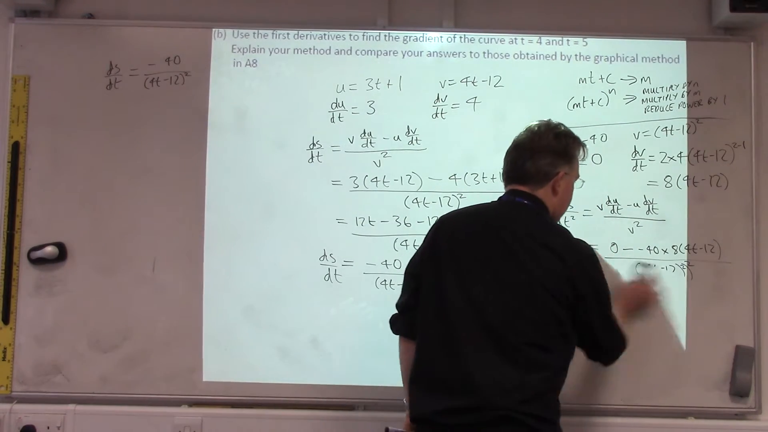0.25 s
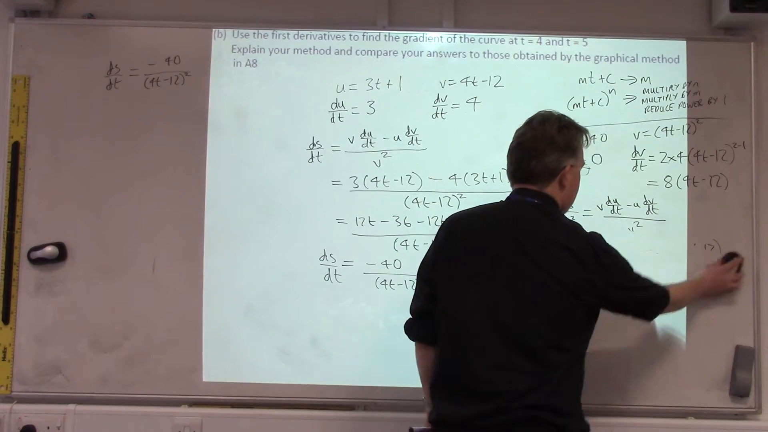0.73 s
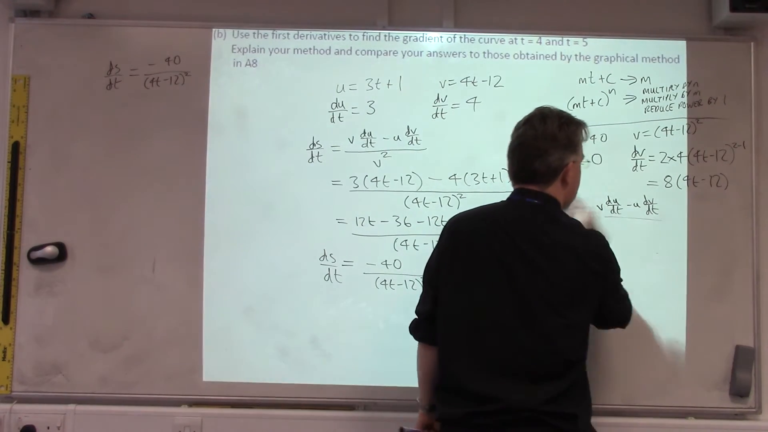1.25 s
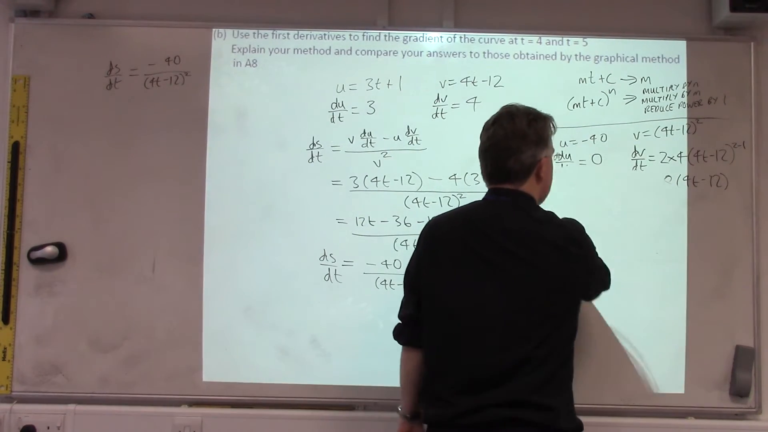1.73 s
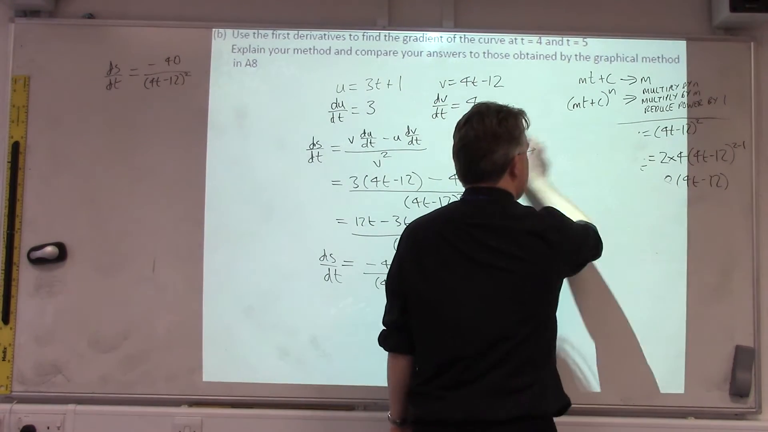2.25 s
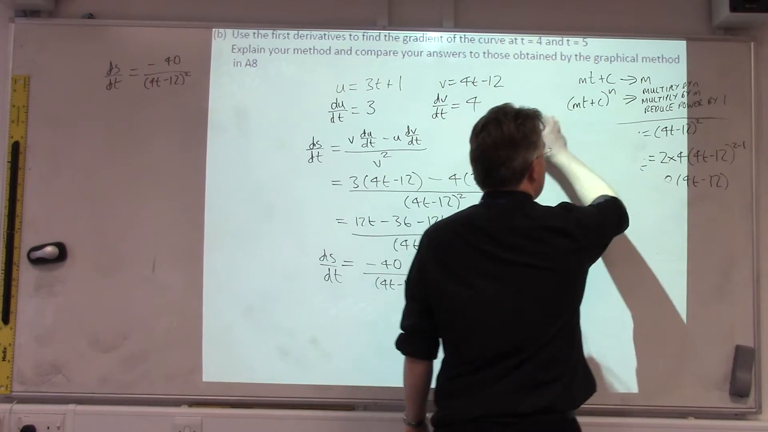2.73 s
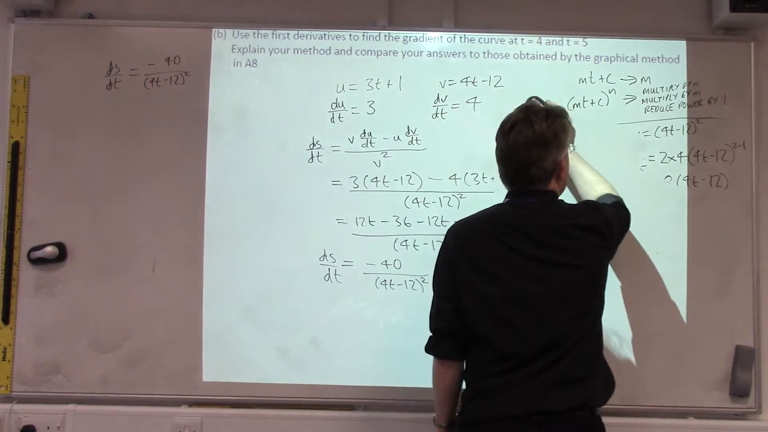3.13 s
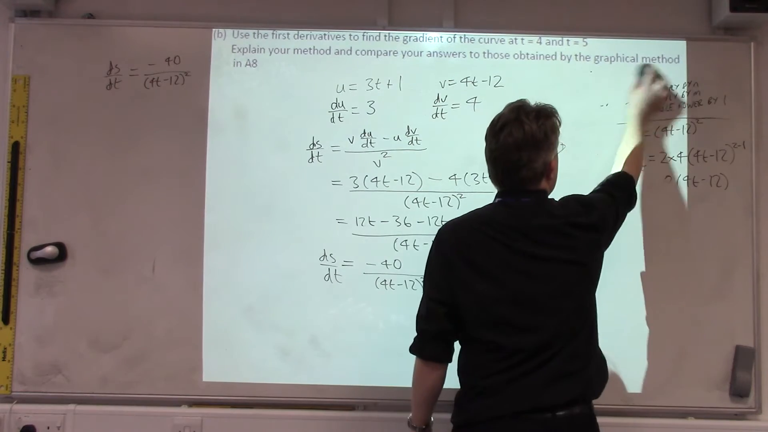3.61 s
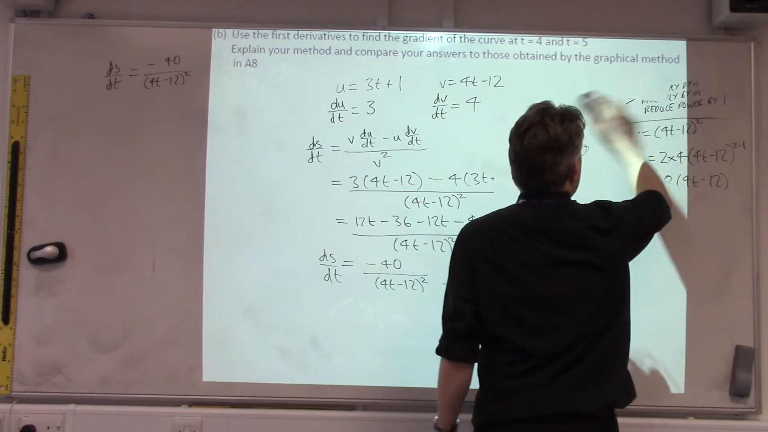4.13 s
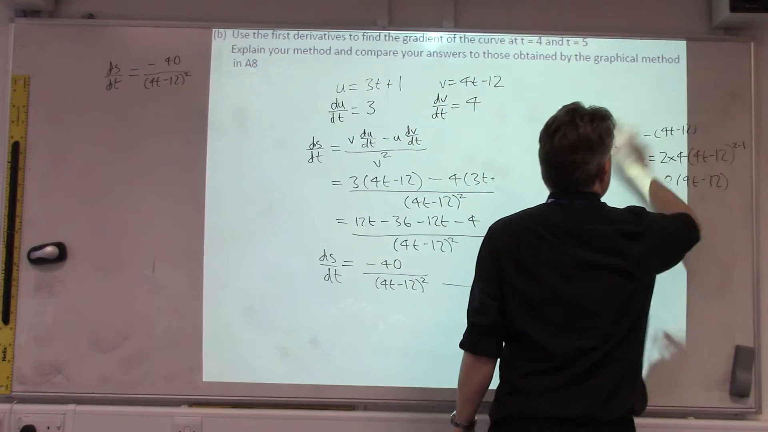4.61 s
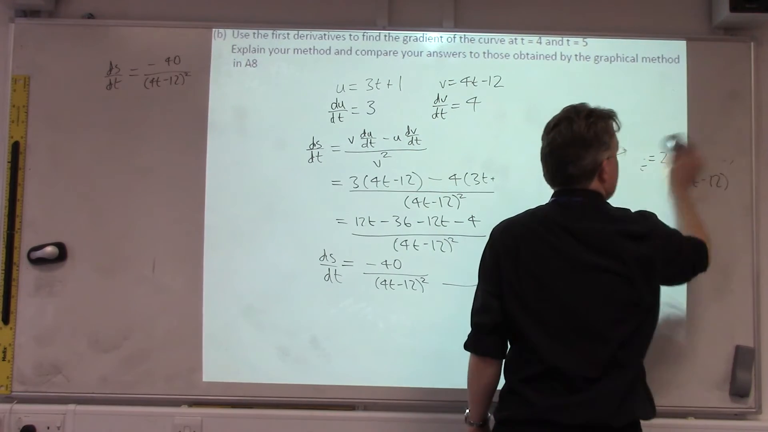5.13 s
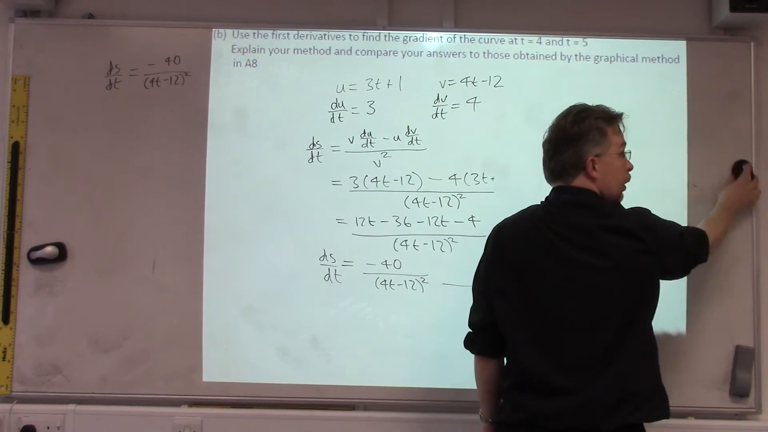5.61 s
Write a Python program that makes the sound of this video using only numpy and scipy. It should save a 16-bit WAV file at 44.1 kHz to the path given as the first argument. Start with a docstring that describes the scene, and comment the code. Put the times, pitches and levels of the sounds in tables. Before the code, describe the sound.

A felt eraser swishes rapidly back and forth over a whiteboard, with two brief clusters of light knocks, above a steady projector fan hum.

```python
"""First one hears the quick hiss of a felt eraser wiping to and fro over a whiteboard in a classroom.
Fibre slips, noise shaped by hand speed and pressure, give the hiss and rasp; friction noise rumbles the panel.
Two clusters of knocks and a fainter tap between them mix noise bursts with decaying sine modes.
A projector fan runs throughout, as shaped noise with unsteady tones; a dense noise tail is the room."""
import sys
import numpy as np
from scipy import signal
from scipy.fft import rfft, irfft
from scipy.io import wavfile

SR = 44100
rng = np.random.default_rng(int(sys.argv[2]) if len(sys.argv) > 2 else 0)


def unload_wav(signal):
    """Save mono or channel-first audio to the path in sys.argv[1] as 16-bit WAV at rate SR, clipped to [-1, 1]."""
    wavfile.write(
        sys.argv[1],
        SR,
        np.round(np.clip(np.atleast_2d(signal).T, -1, 1) * 32767).astype(np.int16),
    )


N = 258426
TIME = np.arange(N) / SR
HZ = np.fft.rfftfreq(N, 1 / SR)


def amp(db):
    """Level law: decibels to amplitude gain."""
    return 10 ** (np.asarray(db) / 20)


def unit(x):
    """Normalisation: scales a signal to rms 1."""
    return x / np.sqrt(np.mean(x ** 2) + 1e-20)


def read(points, hz):
    """Interpolation: reads a curve on a log-frequency axis."""
    f, value = np.transpose(points)
    return np.interp(np.log(hz + 1), np.log(f), value)


def follow(rows):
    """Interpolation: a control curve at every sample."""
    return np.interp(TIME, *np.transpose(rows))


def colour(x, spectrum):
    """Linear filtering: weights the spectrum of x, then normalises to rms 1."""
    gain = amp(read(spectrum, np.fft.rfftfreq(len(x), 1 / SR)))
    return unit(irfft(rfft(x) * gain, len(x)))


def wander(hz):
    """Low-pass noise: slow chance of rms 1, up to about hz changes a second."""
    lowpass = np.exp(-(HZ / hz) ** 2)
    return unit(irfft(rfft(rng.standard_normal(N)) * lowpass, N))


def band(centre_hz, width_hz):
    """Quadrature modulation: narrow-band noise whose centre may move."""
    phase = 2 * np.pi * np.cumsum(centre_hz * np.ones(N)) / SR
    return unit(wander(width_hz) * np.cos(phase) + wander(width_hz) * np.sin(phase))


def add(mix, s, sound):
    """Superposition: mixes a sound in at time s."""
    part = mix[max(round(s * SR), 0):][:len(sound)]
    part += sound[:len(part)]


def swell(s, length):
    """Half-cosine window: a smooth rise and fall around time s."""
    return np.cos(np.pi * np.clip((TIME - s) / length, -.5, .5))


# relative spectrum of the fan's air noise: f/Hz, density level/dB
FAN_AIR = [(30, -31), (85, -13), (130, -9), (215, -0.5), (340, 1.5), (430, -2.5), (560, -2.5), (720, -7),
           (1400, -11), (2100, -16.5), (2600, -16), (3400, -21), (6300, -28.5), (11000, -38), (15700, -47)]
# blade and motor tones: f/Hz, rms level before the common trim/dB
FAN_TONES = [(207, -61), (296, -62), (525, -57), (590.5, -62), (886, -66), (1223, -71), (1394, -70),
             (1772, -73.5), (2362, -74), (2435, -72.5), (2583, -76)]
FAN_AIR_DB = -49.5
# pitch drift of a tone at 500 Hz; higher tones are steadier
FAN_DRIFT_HZ, FAN_DRIFT_SLOPE = 4.566, 0.488


def fan(tones_db=-1, waver_db=3):
    """Flow noise and rotation tones: steady air, with tones that drift in pitch and waver in level."""
    out = amp(FAN_AIR_DB) * colour(rng.standard_normal(N), FAN_AIR)
    for hz, db in FAN_TONES:
        drift_hz = FAN_DRIFT_HZ * (500 / hz) ** FAN_DRIFT_SLOPE
        phase = 2 * np.pi * np.cumsum(hz + drift_hz * wander(hz=24.54)) / SR
        tone = np.sin(phase) * amp(waver_db * wander(hz=8.2))
        out += amp(db + tones_db) * unit(tone)
    return out


# decay of the classroom: f/Hz, reverberation time to -60 dB t60/s
ROOM_DECAY = [(100, 0.28), (500, 0.16), (2000, 0.42), (6000, 0.55), (14000, 0.067)]


def room(x, first_s=0.0056):
    """Reverberation: dense reflections decay at a rate set by frequency, fastest at the top."""
    taps = rng.standard_normal(SR // 2) * (np.arange(SR // 2) > first_s * SR)
    hz, t, z = signal.stft(taps, SR, nperseg=256)
    decay = amp(-60 * t / read(ROOM_DECAY, hz)[:, None])
    tail = signal.istft(z * decay, SR, nperseg=256)[1]
    return signal.fftconvolve(x, tail / np.linalg.norm(tail))[:N]


# how loosely the panel moves, stiffer towards its frame: t/s, rumble level before speed is added/dB
LOOSENESS = [(0, -55), (.28, -55), (.6, -57.5), (1.65, -54.5), (1.9, -60), (2.2, -57), (2.45, -54),
             (3.1, -72), (4.4, -76), (5.86, -70.5)]
# felt judders and panel groans: middle t/s, length/s, centre f/Hz, level/dB
JUDDERS = [(0.053, 0.23, 253, -50.5), (0.15, 0.3, 154.3, -51.5), (0.727, 0.082, 245, -44.5),
           (0.83, 0.19, 125.2, -57), (1.078, 0.15, 150, -54.5), (1.704, 0.12, 180, -53),
           (2.142, .22, 80, -60), (2.168, 0.12, 169, -48), (3.237, 0.064, 296.6, -48.5),
           (4.746, 0.059, 235, -51), (5.058, .2, 92.6, -58)]
# relative spectrum of the rumble: f/Hz, density level/dB
RUMBLE = [(25, -44), (45, -20), (60, -17), (75, -0.5), (95, -8), (160, -2.5), (260, 4.5), (500, -6),
          (1200, -37), (4000, -80)]


def panel(speed_db, speed_share=0.32, judder_width_hz=45):
    """Friction-driven vibration: rubbing shakes the loose panel; now and then the felt judders on it."""
    rumble_db = follow(LOOSENESS) + speed_share * (speed_db - speed_db.mean())
    out = amp(rumble_db) * colour(rng.standard_normal(N), RUMBLE)
    for s, length, hz, db in JUDDERS:
        grip = swell(s, length)
        shake = grip * band(hz, judder_width_hz)
        # match the energy of the swell, so that chance does not set the level
        shake *= np.linalg.norm(grip) / np.linalg.norm(shake)
        out += amp(db) * shake
    return out


# eraser strikes and rocks: t/s, clack level/dB, brightness/(dB per octave), boom level/dB,
# panel ring level/dB, shell f/Hz, shell level/dB (levels before decay)
BLOWS = [(2.6601, -40.5, 2, -39, -41.5, 1860, -38), (2.695, -39.5, -4, -58, -68, 1050, -37),
         (2.723, -57, 6, -56, -56, 650, -33.5), (3.738, -52, 6, -75, -75, 3800, -46),
         (4.9623, -36.5, -0.5, -63, -70, 1370, -35), (4.9665, -39.5, 0.5, -67, -70, 2030, -47),
         (4.972, -36.5, -2, -50, -31, 2570, -45), (4.997, -50, 1, -45.5, -41, 840, -40),
         (5.024, -46, -6, -50, -49, 1460, -47)]
# modes of the panel: f/Hz, relative level/dB, t60/s
PANEL_MODES = [(232.3, 6.5, 0.22), (274, -5, 0.52), (327, -15, 0.073), (406, -9, 0.15), (730, -21, .09),
               (820, -11, 0.16), (1070, -18, 0.11), (1280, -11, 0.082)]
# relative spectra of clack (before brightness tilt) and boom: f/Hz, density level/dB
CLACK = [(30, -70), (150, -26), (400, -7), (750, 13.5), (1350, 7), (1700, 1.5), (2800, 2.5), (4500, -13),
         (7000, -12.5), (11000, -36), (15700, -50)]
BOOM = [(40, -41), (80, -24), (125, -8.5), (200, -7.5), (280, -7.5), (450, -20), (1000, -22), (3000, -62)]


def knocks(clack_t60=0.11, shell_t60=0.031, boom_t60=0.62, boom_rise=0.0035, ring_rise=0.0069):
    """Impact excitation: the shell clacks, pitched by the corner that lands; the panel booms and rings."""
    t = np.arange(SR // 2) / SR  # each blow is cut off after half a second
    out = np.zeros(N)
    ring = sum(amp(db - 60 * t / t60) * np.sin(2 * np.pi * hz * t) for hz, db, t60 in PANEL_MODES)
    ring *= 1 - np.exp(-t / ring_rise)
    for s, clack_db, tilt_db, boom_db, ring_db, shell_hz, shell_db in BLOWS:
        tilted = [(hz, db + tilt_db * np.log2(hz)) for hz, db in CLACK]
        clack = colour(rng.standard_normal(len(t)), tilted) * amp(clack_db - 60 * t / clack_t60)
        shell = np.sin(2 * np.pi * shell_hz * t) * amp(shell_db - 60 * t / shell_t60)
        boom = colour(rng.standard_normal(len(t)), BOOM) * amp(boom_db - 60 * t / boom_t60)
        boom *= 1 - np.exp(-t / boom_rise)
        add(out, s, clack + shell + boom + amp(ring_db) * ring)
    return out


# sweeps of the hand from turn to turn: start t/s, end t/s, hiss control level/dB,
# rasp control level/dB, lean (over 1 is fastest late)
STROKES = [(-0.1, 0.163, -51, -54, 1), (0.16, 0.46, -52.5, -51, 1), (0.478, 0.806, -52.5, -56, 1.1),
           (0.825, 1.175, -53.5, -52, .95), (1.179, 1.49, -53, -47.5, 1.3), (1.501, 1.77, -52.5, -48, 1.05),
           (1.775, 2.054, -53.5, -51, 1.15), (2.06, 2.395, -53, -48.5, .95), (2.445, 2.7, -60, -53, .8),
           (2.619, 2.92, -58, -51, 1.15), (3.411, 3.714, -53, -49, 0.957), (3.721, 4.044, -53.5, -52, 1),
           (4.061, 4.415, -53.5, -57, 1.1), (4.446, 4.74, -55, -52.5, 1.05),
           (4.724, 5.022, -54.5, -54, 1.05), (5.025, 5.339, -55, -52, 1), (5.372, 5.675, -56, -53, 1.05),
           (5.722, 5.999, -54.5, -55, 1.05)]
# the hand turns in a loop, so a share of its speed is left at the ends
TURN_SPEED, ARCH_POWER, SETTLE_S = .27, 0.94, .04
CREEP_DB = -76.5  # floor of both controls, as the felt creeps between strokes


def hand():
    """Kinematics: one arch for each stroke gives speed and pressure, as hiss and rasp controls in dB."""
    speed = pressure = amp(CREEP_DB) * np.ones(N)
    for start, end, hiss_db, rasp_db, lean in STROKES:
        inside = np.clip(TIME, start, end)
        progress = (inside - start) / (end - start)
        arch = abs(np.sin(np.pi * progress ** lean)) ** ARCH_POWER
        settle = np.exp(-abs(TIME - inside) / SETTLE_S)
        sweep = (TURN_SPEED + (1 - TURN_SPEED) * arch) * settle
        speed = np.maximum(speed, amp(hiss_db) * sweep)
        pressure = np.maximum(pressure, amp(rasp_db) * sweep)
    return 20 * np.log10(speed), 20 * np.log10(pressure)


def fibres(per_s, spread_db):
    """Shot noise: countless tiny slips of felt fibres at random instants, varied in size."""
    size = amp(spread_db * np.minimum(rng.exponential(1, N), 5))
    return size * rng.standard_normal(N) * (rng.random(N) < per_s / SR)


# relative spectra of hiss, finest fizz and heavy rub: f/Hz, density level/dB
FELT_HISS = [(60, -29), (200, -4), (330, -6), (570, 8.5), (750, -10), (1400, -1.5), (3000, 0.5), (3900, 0),
             (4800, -3), (6300, -1), (8300, -6), (10200, -8), (12000, -14), (15700, -32)]
FIZZ = [(2000, -50), (6500, -16), (8300, -5), (10000, -2), (12000, -13.5), (14000, -17), (15700, -27)]
HEAVY_FELT = [(60, -14), (300, 6), (1000, 5.5), (1350, -1.5), (1800, 1), (2400, -6.5), (3300, -23),
              (6500, -20), (15700, -50)]
# slow, heavy pushes of the felt: middle t/s, length/s, level before the drag trim/dB
DRAGS = [(2.501, 0.21, -52), (3.015, 0.23, -51)]
# the dark rub under ordinary strokes (before the drag trim), and how much it follows their speed
LIGHT_DRAG_DB, DRAG_SPEED_SHARE = -63, 0.19


def felt(speed_db, pressure_db, hiss_db=0, fizz_db=-15, fizz_growth=0.35, rasp_db=-13.0, rasp_hz=2650,
         rise_hz_per_db=30, rasp_width_hz=650, drag_db=1.0, flutter_db=0.55):
    """Sliding friction: slips hiss with speed, pressure rasps higher with speed, dragging rubs darkly."""
    haste_db = speed_db - np.median(speed_db)
    hiss = amp(speed_db + hiss_db) * colour(fibres(per_s=24000, spread_db=-0.2), FELT_HISS)
    # the finest fizz needs a fast hand, so a stroke is brightest where it is fastest
    fizz_level_db = speed_db + fizz_db + fizz_growth * haste_db
    fizz = amp(fizz_level_db) * colour(rng.standard_normal(N), FIZZ)
    rasp = amp(pressure_db + rasp_db) * band(rasp_hz + rise_hz_per_db * haste_db, rasp_width_hz)
    weight = amp(LIGHT_DRAG_DB + DRAG_SPEED_SHARE * haste_db)
    for s, length, db in DRAGS:
        weight = np.maximum(weight, amp(db) * swell(s, length))
    drag = weight * amp(drag_db) * colour(fibres(per_s=2500, spread_db=0.5), HEAVY_FELT)
    uneven_grip = amp(flutter_db * wander(hz=44.7))
    return (hiss + fizz + rasp + drag) * uneven_grip


def scene(felt_wet_db=-21, knock_wet_db=-11):
    """Superposition: all sources add at one microphone, the same in both channels."""
    speed_db, pressure_db = hand()
    wiping = felt(speed_db, pressure_db)
    hits = knocks()
    reflections = room(amp(felt_wet_db) * wiping + amp(knock_wet_db) * hits)
    mono = fan() + reflections + panel(speed_db) + hits + wiping
    return np.array([mono, mono])


def record(dry):
    """Band limitation: a linear-phase low-pass sets the recorder's upper edge."""
    taps = signal.firwin(1023, 15720, window=("kaiser", 9), fs=SR)  # edge in Hz
    return signal.oaconvolve(dry, taps[None], "same")


dry = scene()
out = record(dry)
unload_wav(out)
```